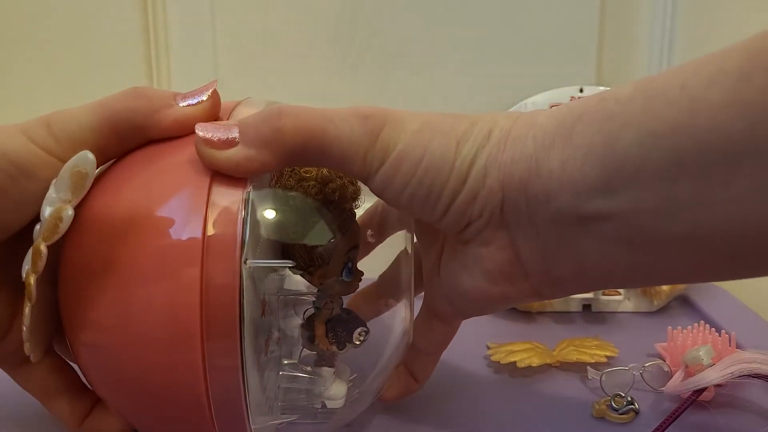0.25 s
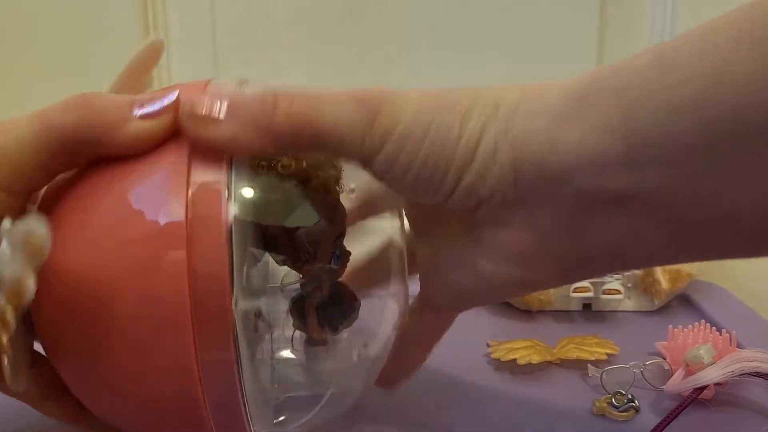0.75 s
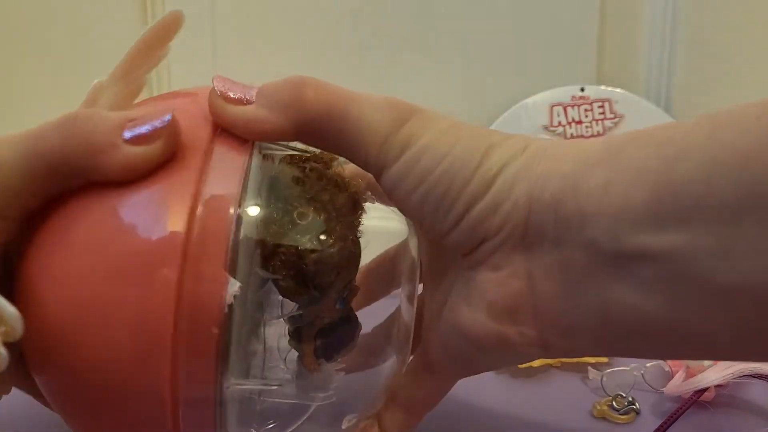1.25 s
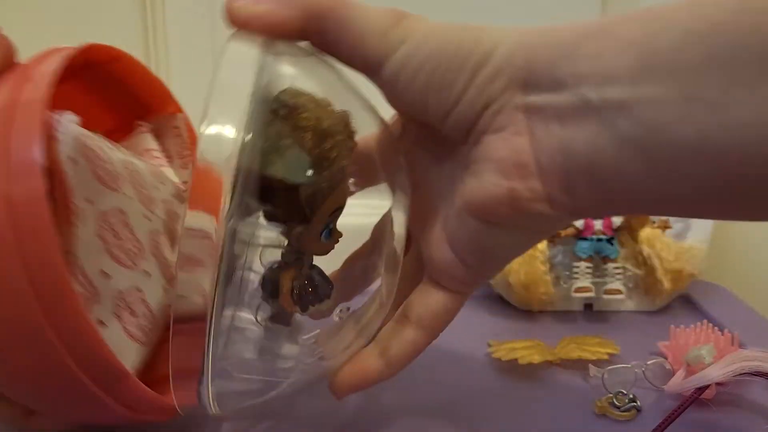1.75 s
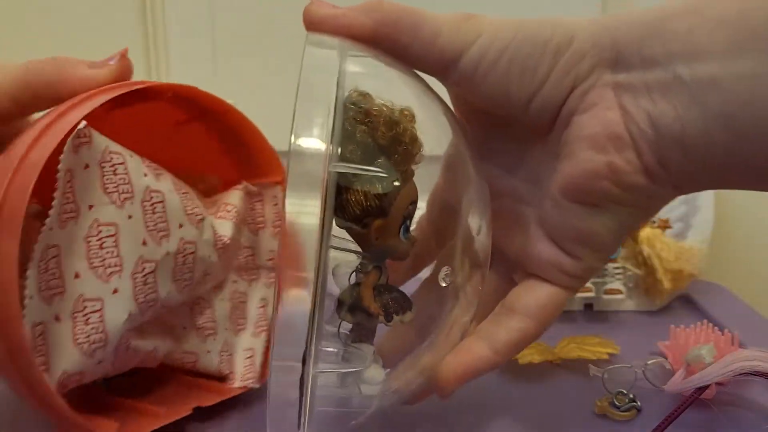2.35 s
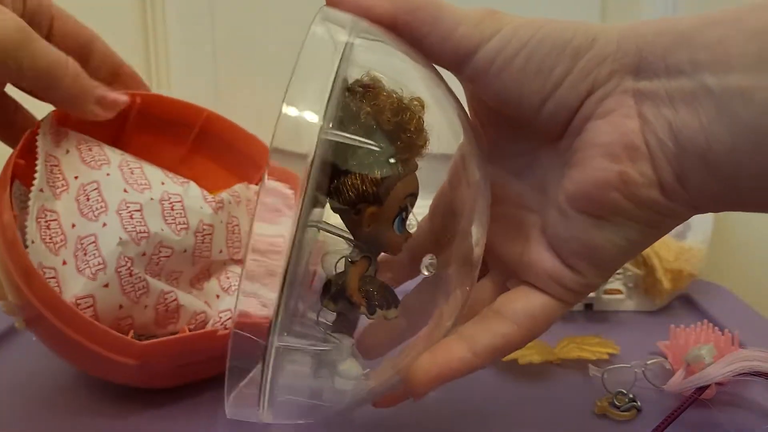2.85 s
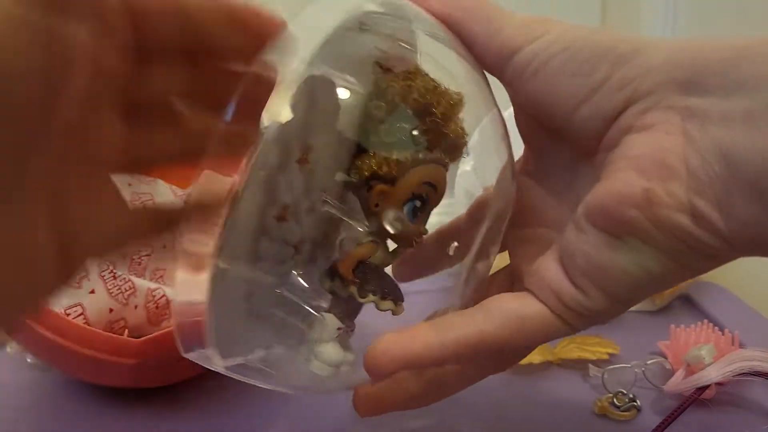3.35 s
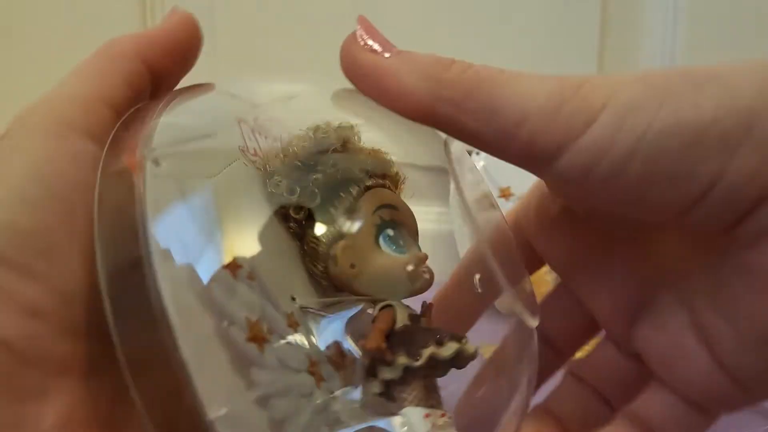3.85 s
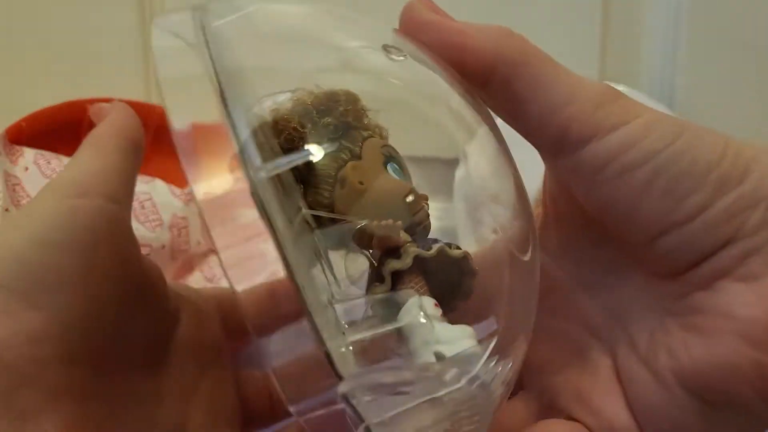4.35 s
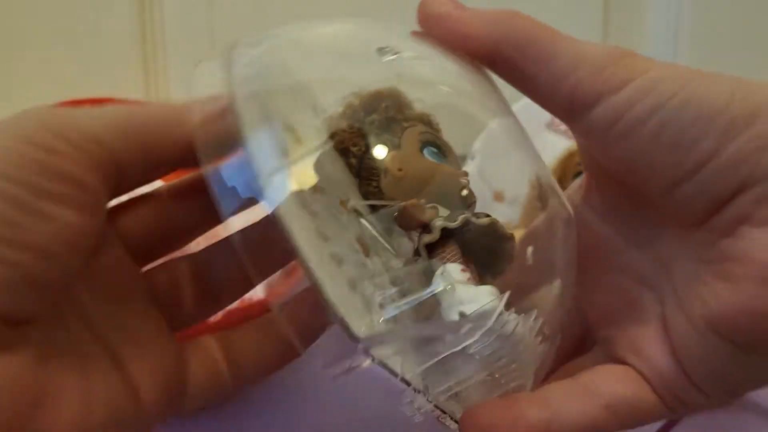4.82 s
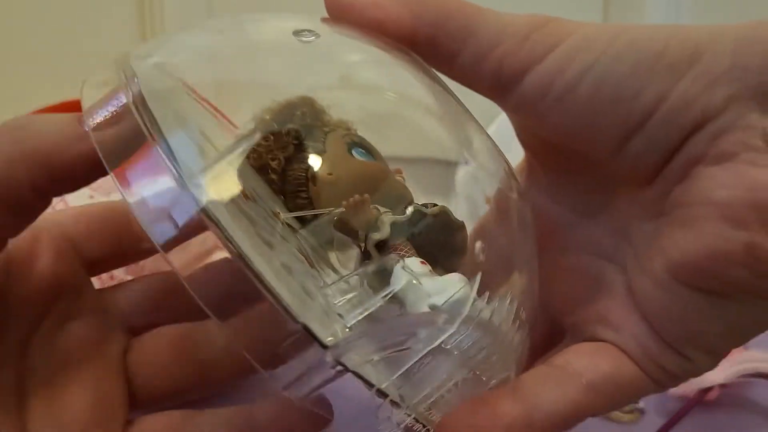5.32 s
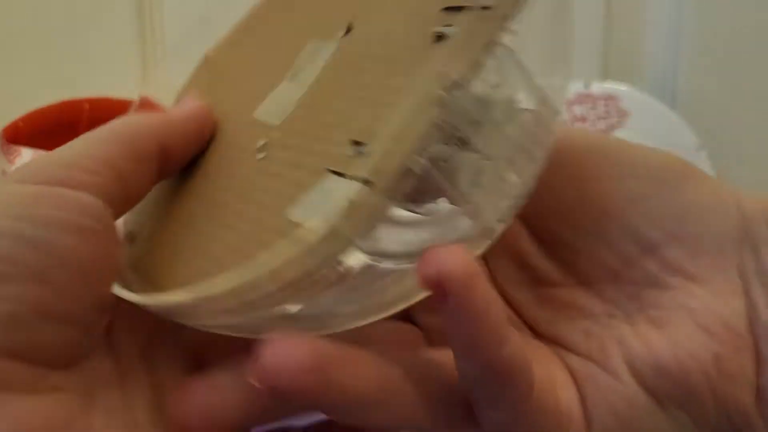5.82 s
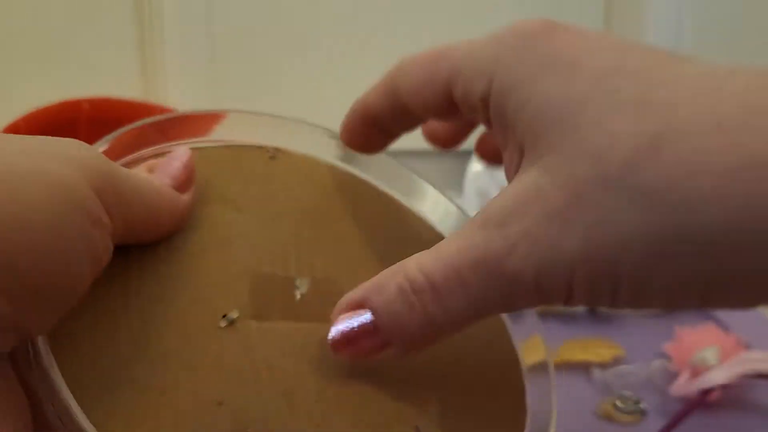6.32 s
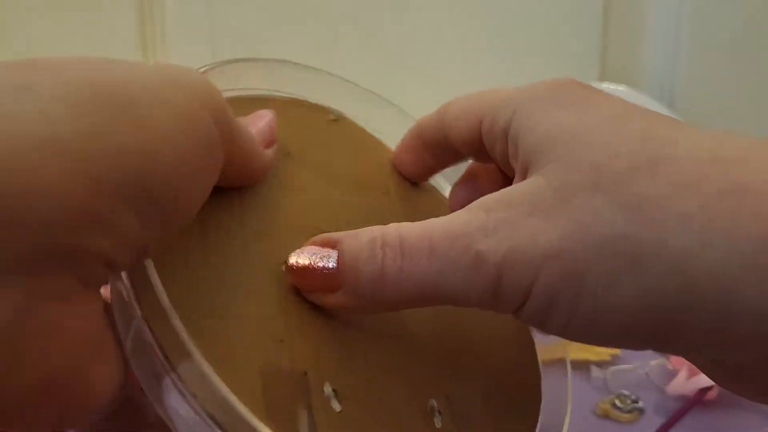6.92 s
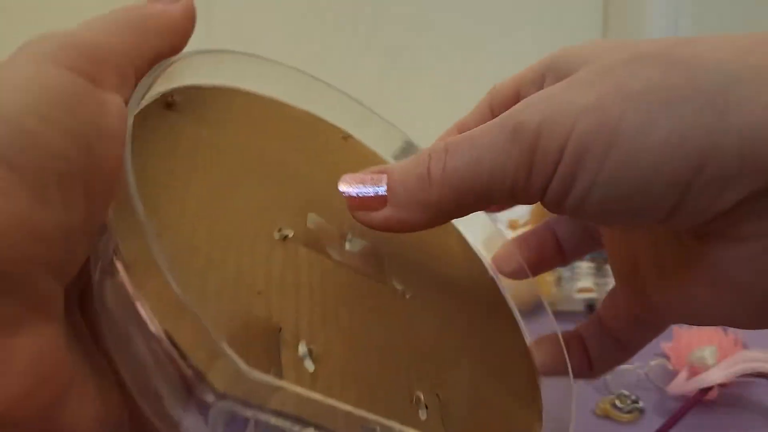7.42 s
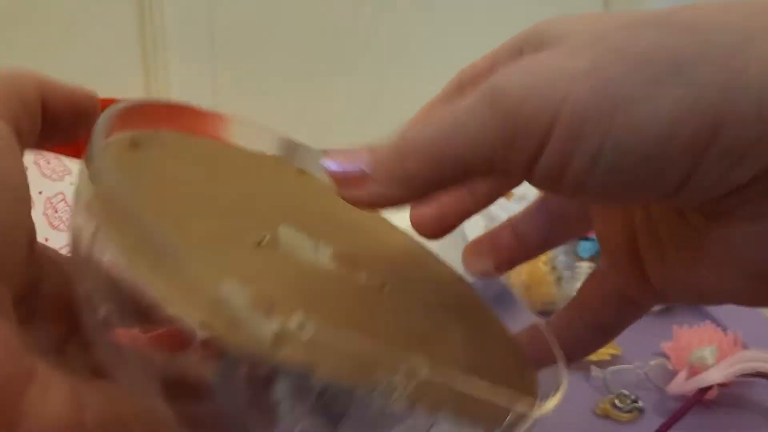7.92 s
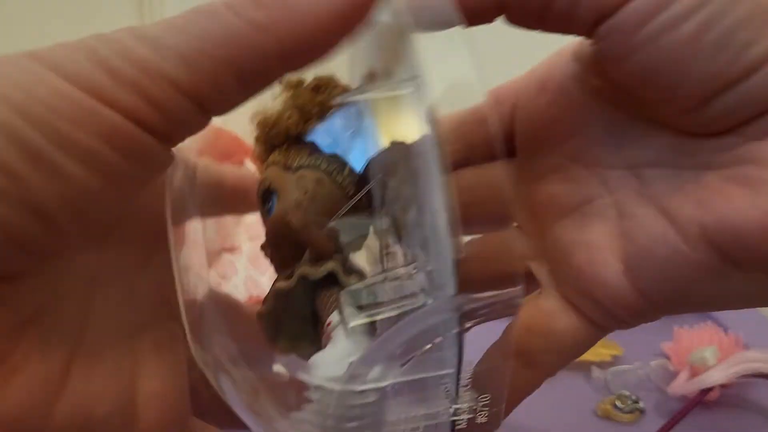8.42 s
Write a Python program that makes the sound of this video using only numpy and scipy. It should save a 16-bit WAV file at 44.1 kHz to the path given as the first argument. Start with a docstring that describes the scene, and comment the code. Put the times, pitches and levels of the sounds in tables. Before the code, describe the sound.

In a small quiet indoor room, close to a stereo microphone, hands pry apart a hollow plastic ball. After near silence come faint ticks, then a loud crack with a low table thump and a cluster of snaps. Lighter rustling and taps follow, then squeaky hollow scraping as the shell is turned, and finally isolated hard snaps and a rapid clatter of pops.

```python
"""Hands pry open a hard plastic ball close to a camera, then turn its clear dome over and press its card lid.
From the start, hiss and low shaking lie under a small quiet room; soon fingers slide, scrape and crackle.
Snaps and taps excite the hollow dome's damped modes behind bursts of filtered noise; low bumps thump.
Sliding is a train of random slips through moving resonances; from 3.4 s, with the ball held in the air,
much less of it reaches the table. Snaps and rubbing go on until past 8 s."""
import sys
import numpy as np
from scipy import signal
from scipy.fft import rfft, irfft
from scipy.io import wavfile
from scipy.ndimage import uniform_filter1d, map_coordinates

SR = 44100
rng = np.random.default_rng(int(sys.argv[2]) if len(sys.argv) > 2 else 0)


def transcribe(signal):
    """Save signal, clipped to [-1, 1], as a 16-bit WAV file at the path in sys.argv[1]."""
    frames = np.atleast_2d(signal).T
    limited = np.clip(frames, -1, 1)
    pcm = np.round(limited * 32767).astype(np.int16)
    wavfile.write(sys.argv[1], SR, pcm)


N = 382617

# Modes of the dome. Each row: frequency in Hz, relative level in dB, decay time t60 in seconds,
# before the grip bends and damps them.
DOME_MODES = [(434.7, 2.5, 0.1), (563, 0.5, 0.054), (642, 5, 0.043), (716, 6.5, 0.077), (821, 0, 0.16),
              (1278, -1, 0.073), (1670, -4.5, 0.11)]
# Spectrum of the table's rumble. Each row: frequency in Hz, relative density in dB per Hz.
TABLE_SPECTRUM = [(60, -33), (95, 3.5), (130, -5.5), (180, -7), (260, -15), (330, -15), (420, -39)]


def snaps():
    """Impact excitation: crack and tick bursts with the damped dome, for left, right and the walls."""
    # Each row: start in seconds, dome ring in dB, dome pitch in Hz, crack in dB, crack colour in Hz,
    # tick in dB, ring time as a factor.
    snap_rows = [(0.748, -42, 644, -49.5, 1820, -65, 0.77), (0.828, -40, 417, -40.5, 2930, -39.5, 0.36),
                 (0.886, -33.5, 403, -50, 1900, -38.5, 0.28), (0.918, -35.5, 446, -36, 3860, -42, 0.38),
                 (0.952, -38, 388, -38, 1270, -36.5, 0.35), (1.334, -27, 507, -37, 3870, -29, 1),
                 (1.357, -16, 930, -16, 3260, -17.5, 0.53), (1.373, -2, 569, -14.5, 3620, -38.5, 0.25),
                 (1.784, -35.5, 476, -38.5, 2020, -35, 0.86), (1.796, -33, 438, -28.5, 1740, -36.5, 0.76),
                 (1.801, -20.5, 531, -22.5, 1850, -26.5, 1), (1.815, -31, 560, -25.5, 4160, -21, 0.95),
                 (1.864, -11.5, 538, -31.5, 2130, -31, 0.9), (1.867, -7.5, 677, -16, 2155, -9, 0.9),
                 (1.898, -15, 520, -18, 2540, -15.5, 0.23), (1.904, -10, 539, -7.5, 3470, -17, 0.8),
                 (2.189, -47.5, 480, -56, 3370, -50, 0.52), (2.251, -31.5, 498, -37, 1250, -45.5, 0.48),
                 (2.623, -20.5, 813, -33.5, 1670, -41.5, 0.4), (2.744, -25.5, 459, -37, 2000, -68, 0.29),
                 (2.778, -25, 460, -25, 3170, -27, 0.62), (2.881, -41, 764, -38.5, 1670, -45, 0.68),
                 (3.051, -32.5, 474, -37, 3280, -42, 0.3), (3.07, -26.5, 585, -28.5, 1160, -36, 0.38),
                 (3.465, -26.5, 711, -44, 1657, -44, 0.45), (3.529, -41, 654, -37, 2960, -43.5, 1),
                 (3.718, -34.5, 440, -45.5, 2620, -55, 0.24), (3.827, -44, 595, -36, 2800, -44, 0.32),
                 (3.835, -20.5, 656, -22, 2700, -34, 0.19), (3.845, -11.5, 574, -26, 1640, -34, 0.67),
                 (3.88, -28, 555, -33, 3200, -38, 0.58), (3.919, -45.5, 608, -42.5, 5270, -43, 0.88),
                 (4.263, -27.5, 738, -41, 1680, -50, 0.89), (4.329, -6.5, 705.6, -19, 5100, -12, 0.69),
                 (4.437, -25, 727, -35, 1260, -29, 0.46), (4.451, -32, 720, -39, 1230, -48.5, 1),
                 (4.791, -33.5, 832, -50.5, 2925, -48.5, 0.89), (4.986, -35, 823, -37.5, 2970, -44.5, 0.94),
                 (5.044, -27.5, 793, -46, 3000, -40, 0.84), (5.112, -24, 880, -43.5, 1660, -44, 0.27),
                 (5.162, -23.5, 808, -47, 1670, -48, 0.28), (5.257, -30.5, 620, -48, 1730, -44.5, 1),
                 (5.337, -19, 870, -36.5, 1670, -52.5, 0.26), (5.363, -25, 537, -45, 1490, -61, 0.58),
                 (5.376, -36.5, 860, -36, 1610, -30, 0.58), (5.393, -28.5, 640, -31, 1640, -41, 0.71),
                 (5.418, -46.5, 700, -47, 4000, -41, 0.47), (5.445, -24, 734, -46, 2200, -52, 0.52),
                 (5.459, -29.5, 680, -48, 1280, -56, 0.25), (5.516, -29.5, 820, -42, 1460, -46, 0.38),
                 (5.526, -16.5, 742, -47, 2900, -34.5, 0.83), (5.572, -22.5, 627, -33, 1240, -39, 0.5),
                 (5.6, -32.5, 731, -39, 2980, -46, 0.8), (5.614, -25.5, 696, -28, 2670, -31.5, 0.29),
                 (5.844, -32.5, 552, -42.5, 1494, -52, 0.74), (5.954, -9, 655, -28.5, 1363, -30.5, 0.5),
                 (6.34, -35.5, 585, -50.5, 1637, -58, 0.57), (6.363, -44.5, 627, -50.5, 1890, -66.5, 0.57),
                 (6.443, -39, 414, -74, 2800, -65, 0.44), (6.48, -33, 651, -54, 3100, -62, 0.42),
                 (6.62, -47, 716, -63, 1640, -71, 0.7), (6.663, -35.5, 726.6, -64, 1800, -61.5, 0.42),
                 (6.68, -38, 690, -43.5, 2840, -68, 0.5), (6.731, -36, 390, -36.5, 2700, -41, 1),
                 (6.745, -29.5, 585, -42, 1380, -47, 0.79), (6.816, -39, 570, -45, 2570, -44, 0.55),
                 (6.862, -54.5, 716, -42, 1920, -46, 0.38), (6.879, -33, 450, -46, 1360, -40, 0.41),
                 (6.903, -48.5, 418, -43.5, 1620, -36, 0.82), (6.983, -46, 685, -54.5, 2500, -62.5, 0.5),
                 (6.9995, -5.5, 651, -13, 1930, -15.5, 0.38), (7.135, -36.5, 800, -39.5, 2520, -49, 0.73),
                 (7.176, -33, 816, -31, 3320, -48, 0.84), (7.191, -25.5, 575, -40, 1303, -39, 0.68),
                 (7.242, -39, 710, -44, 1700, -54, 0.69), (7.399, -29.5, 716, -46, 1716, -55, 0.47),
                 (7.612, -11.5, 715, -21, 5280, -19, 0.41), (7.671, -5, 561, -20, 1260, -19.5, 0.58),
                 (7.71, -6, 601.5, -23, 1220, -14.5, 0.67), (7.714, -5.5, 745, -27, 1250, -41, 0.4),
                 (7.734, -5, 684, -19, 2920, -51, 0.15), (7.747, -18.5, 433, -16, 1250, -29.5, 0.88),
                 (7.749, -26, 442, -23, 12100, -45, 1), (7.751, -1.5, 715, -30, 1270, -39.5, 0.33),
                 (8.165, -24, 653, -49, 1500, -57.5, 0.43), (8.195, -19.5, 653, -30, 1410, -39, 0.36),
                 (8.238, -31, 645, -31, 2770, -30, 1), (8.263, -15, 730, -34, 1620, -28.5, 0.29),
                 (8.296, -27.5, 680, -23, 2780, -49, 1), (8.333, -5.5, 634, -22, 1400, -21.5, 0.49)]
    # Spectra of crack and tick. Each row: frequency in Hz, relative density in dB per Hz.
    crack_spectrum = [(530, -15), (900, -15.5), (1270, -7.5), (1840, -6.5), (2760, -5), (3280, -3.5),
                      (4580, -12.5), (5080, -21), (6000, -18.5), (7800, -50.5), (13200, -120)]
    tick_spectrum = [(2650, -30.5), (4500, -6.5), (5380, -3), (6580, -10), (8050, -2.5), (9840, -18),
                     (12400, -15), (13700, -18.5), (15400, -16.5), (16500, -28.5)]
    swell_s = 0.00306  # the dome's ring builds up over this time
    crack_late_s = 0.00042  # the rim lets go just after the dome starts to move
    spread_ms = 0.063  # each touch lands somewhere else on the shell, so its delay differs
    rim_to_walls = 0.4  # the rim's own colour is heard close by; less comes back from the walls

    out = np.zeros((3, N + SR))
    t = np.arange(SR // 8) / SR
    mode_hz = np.transpose(DOME_MODES)[0][:, None]
    phases = rng.uniform(-2.4, 1.5, (len(snap_rows), len(DOME_MODES), 1))
    bursts = rng.standard_normal((len(snap_rows), 2, len(t)))
    late_s = spread_ms / 1000 * rng.standard_normal(len(snap_rows))
    since_onset = np.maximum(t - np.array([[crack_late_s], [0]]), 0)
    bursts *= 1 - np.exp(-(since_onset / 0.001) ** 2)
    crack_decay = gain_of(-60 * t / 0.026) + 0.04 * gain_of(-60 * t / 0.1)
    tick_decay = gain_of(-60 * t / 0.021) + 0.096 * gain_of(-60 * t / 0.023)
    cracks = coloured(bursts[:, 0] * crack_decay, crack_spectrum)
    ticks = coloured(bursts[:, 1] * tick_decay, tick_spectrum)
    since_swell = t - swell_s  # the ring decays from the end of the swell, each mode at its own random phase

    for k, (s, dome_db, hz, crack_db, crack_hz, tick_db, lasting) in enumerate(snap_rows):
        distance = np.log(mode_hz / hz)
        # the place of the blow favours modes near its pitch
        weights = 0.34 + np.exp(-(distance / 0.095) ** 2)
        # the grip bends the shell until the nearest mode meets the pitch
        bend = hz / mode_hz[np.argmin(abs(distance))]
        dome = ring(since_swell, bend, weights, phases[k], max(lasting, 0.1))
        dome = dome * np.clip(t / swell_s, 0, 1) ** 3
        # the part of the rim that lets go
        rim = resonate(cracks[k] + ticks[k], np.full(len(t), crack_hz), max(600, crack_hz / 5))
        rim = gain_of(crack_db) * 2.0 * max(1, crack_hz / 4000) ** 1.5 * rim
        sound = gain_of(dome_db) * dome / abs(dome).max()
        sound += gain_of(crack_db) * cracks[k] + gain_of(tick_db) * ticks[k]

        first = round(s * SR)
        first_right = round((s + late_s[k]) * SR)
        out[0, first:][:len(t)] += sound + rim
        out[1, first_right:][:len(t)] += sound + rim
        out[2, first:][:len(t)] += sound + rim_to_walls * rim
    return out[:, :N]


def ring(t, bend, weights, phases, lasting):
    """Modal superposition: the dome's modes die away exponentially after one blow."""
    hz, db, t60 = np.transpose(DOME_MODES)[:, :, None]
    decay = gain_of(db - 60 * np.maximum(t, 0) / (t60 * lasting))
    return (weights * decay * np.sin(2 * np.pi * hz * bend * t + phases)).sum(0)


def fingers():
    """Stick-slip friction: quick slips ring the hollow shell; finer slips hiss and crackle in clumps."""
    # Pitch of the shell in hand, before its wander. Each row: time in seconds, pitch in Hz.
    hollow_pitch = [(0, 539.5), (3.3, 547), (3.5, 579.4), (5, 724.6), (6, 643), (8.7, 686)]
    # Spectra of rustle and fine hiss. Each row: frequency in Hz, relative density in dB per Hz.
    rustle_spectrum = [(590, -19.5), (1000, -2.5), (1070, -13), (1660, -2.5), (2110, -11.5), (2790, -7.5),
                       (3340, -11), (5500, -14.5), (7150, -32.5), (12100, -120)]
    fine_spectrum = [(2650, -23.5), (4500, -9), (6730, 2), (8010, 3.5), (9020, -8.5), (15100, -7),
                     (16200, -13.5), (16500, -40.5)]
    apart = 0.78  # weight of the noise that differs at each microphone: rubbing comes from a wide patch

    t = np.arange(N) / SR
    wander = 1 + 0.04 * slow_noise(800)  # the grip shifts the hollow pitch
    hz = np.interp(t, *np.transpose(hollow_pitch)) * wander
    drive = slips(N, 520, 5.1)
    lower = evened(resonate(resonate(drive, hz, 170), hz, 480))
    upper = evened(resonate(drive, 1.9 * hz, 490))
    hollow = lower + 0.14 * upper

    short = np.arange(SR // 50) / SR
    # each kind of tick has its own colour
    grains = rng.standard_normal((6, len(short))) * gain_of(-60 * short / 0.0017)
    crackle = evened(sum(signal.oaconvolve(slips(N, 83, 1.8), g)[:N] for g in grains))
    clumps = gain_of(2.0 * slow_noise(900))
    separate = rng.standard_normal((2, N))
    rubbing = clumps * (0.26 * rng.standard_normal(N) + 0.45 * crackle + apart * separate)

    patch_hz = 2900 * gain_of(1.4 * slow_noise(2500))  # each patch of plastic has its own colour
    rustle = evened(coloured(rubbing, rustle_spectrum))
    rustle = rustle + 0.8 * evened(resonate(rustle, patch_hz, 700))
    fine = evened(coloured(rubbing, fine_spectrum))
    scrape_level, rustle_level, fine_level = pressure()
    return scrape_level * evened(hollow) + rustle_level * evened(rustle) + fine_level * fine


def pressure():
    """Friction follows contact pressure: each stroke lands, changes level in contact and fades."""
    # Fingers dragged over shell and wrapper. Each row: start in seconds, contact in seconds,
    # swell during contact in dB, fade t60 in seconds, then at the end of contact the hollow scrape
    # in dB, rustle in dB, fine hiss in dB.
    strokes = [(0.721, 0.05, 4, 0.16, -53.5, -60.5, -64), (0.807, 0.049, 11, 0.76, -55, -51, -53.5),
               (1.079, 0.015, 24, 1, -68, -59.5, -67.5), (1.408, 0.011, -20, 0.71, -45, -49, -58.5),
               (1.779, 0.029, 11.5, 0.079, -50.5, -44, -52.5), (1.929, 0.026, 7, 0.41, -43, -43, -51),
               (2.19, .256, 7, .05, -45, -47, -57), (2.475, .02, 6, .17, -56, -48, -63),
               (2.541, 0.071, 25, 0.1, -55, -60, -59), (2.631, 0.016, -11.5, 1, -48.5, -57.5, -66.5),
               (2.788, 0.055, -7, 0.37, -49.5, -50.5, -58), (2.98, 0.075, 6, 0.22, -85, -56, -66),
               (3.078, 0.018, 3, 0.43, -41, -52, -59.5), (3.477, 0.069, 14, 0.36, -45, -46.5, -50),
               (3.722, 0.16, 1.5, 0.057, -54, -51.5, -58.5), (3.856, 0.014, -29, 1, -48.5, -53, -59.5),
               (4.048, 0.015, 3.5, 0.26, -51, -50, -59.5), (4.211, 0.059, 10, 0.26, -43, -66.5, -69.5),
               (4.444, 0.068, 0.5, 0.058, -33, -53, -60), (4.847, 0.051, -10, 0.092, -53, -72.5, -82),
               (4.953, 0.093, 9.5, 0.11, -37, -50.5, -57.5), (5.046, 0.059, 3.5, 0.031, -33.5, -49.5, -60),
               (5.301, 0.028, -0.5, 0.079, -46, -56, -53), (5.349, 0.033, 7, 0.068, -37, -68, -57),
               (5.47, 0.062, 14.5, 0.21, -27.5, -42, -49.5), (5.762, 0.11, 6.5, 0.23, -47, -58.5, -65.5),
               (5.889, 0.048, 5.5, 0.28, -65, -50.5, -56), (5.971, 0.044, 17.5, 0.059, -76, -49, -45.5),
               (6.333, 0.28, 2.5, .1, -56.5, -68, -76.5), (6.465, 0.017, 6, 0.032, -51.5, -57.5, -62),
               (6.67, 0.061, 24.5, 0.56, -50.5, -56, -62), (6.857, 0.045, -7, 0.077, -59.5, -57.5, -64.5),
               (7.04, 0.12, 7, 0.16, -49, -49.5, -55.5), (7.128, 0.075, 29, 0.15, -43.5, -42, -59),
               (7.27, 0.13, -5, 0.81, -69.5, -73, -85), (8.108, 0.05, 21.5, 0.55, -36.5, -44.5, -58.5),
               (8.218, 0.11, 11, 0.05, -46, -42, -48.5), (8.35, 0.094, 9, 0.085, -44.5, -45.5, -48.5),
               (8.498, 0.091, 16.5, 0.94, -48.5, -49.5, -52.5)]
    touch_s = 0.0072  # a stroke's landing ramp lasts this long

    t = np.arange(N) / SR
    levels = np.zeros((3, N))
    for start, contact, swell_db, t60, *db in strokes:
        i = slice(round(max(start, 0) * SR), round((start + contact + 1) * SR))
        since = t[i] - start
        swell = swell_db * np.minimum(since / max(contact, 0.005) - 1, 0)
        fade = -60 * np.maximum(since - contact, 0) / max(t60, 0.02)
        shape = np.clip(since / touch_s, 0, 1) * gain_of(swell + fade)
        levels[:, i] += gain_of(db)[:, None] * shape
    return levels


def thumps():
    """Damped low oscillation: each bump on the table is a tone that sags, with a dull puff around it."""
    # Low bumps of hands and shell. Each row: start in seconds, level in dB, starting pitch in Hz.
    bumps = [(0.757, -28, 172), (0.882, -33, 186), (0.95, -32, 143), (1.34, -14, 164), (1.375, -6.5, 153),
             (1.536, -35, 196), (1.579, -37.5, 91), (2.015, -32, 78), (2.191, -38.5, 231),
             (2.23, -35, 89.5), (2.623, -32.5, 84), (2.744, -30.5, 141), (2.77, -17.5, 215),
             (3.062, -32, 233), (3.46, -48, 89.6), (3.722, -51, 213), (3.836, -18.5, 224),
             (4.328, -49, 249), (4.648, -63, 56.4), (5.155, -54.5, 151), (5.39, -43, 98),
             (5.441, -40.5, 285), (5.57, -42, 208), (5.951, -38, 227), (6.357, -50, 77.5),
             (6.742, -47, 197), (6.999, -14.5, 124), (7.305, -50.5, 73.5), (7.61, -44, 108),
             (7.749, -13.5, 221), (8.187, -42, 62), (8.301, -30, 88), (8.327, -28.5, 213)]
    # a bump lasts a fixed time plus some cycles; hard ones are shorter
    fixed_t60_s, cycles, hard_t60_s_per_db = 0.04, 8.0, 0.003
    lag_ms = 0.3  # later at the right microphone

    out = np.zeros(N + SR)
    t = np.arange(SR // 3) / SR
    puffs = evened(coloured(rng.standard_normal((len(bumps), len(t))), TABLE_SPECTRUM))
    for (s, db, hz), puff in zip(bumps, puffs):
        t60 = max(fixed_t60_s + cycles / hz - hard_t60_s_per_db * (db + 34.0), 0.03)
        tone = np.sin(2 * np.pi * hz * t / (1 + 3 * t))
        attack = 1 - np.exp(-t / 0.00079)
        out[round(s * SR):][:len(t)] += gain_of(db - 60 * t / t60) * attack * (tone + 1.1 * puff)
    right = np.roll(out, round(lag_ms * SR / 1000))
    return np.array([out, right])[:, :N] * gain_of([[1.8], [-1.8]])


def rumble(pressing):
    """Structure-borne sound: low shaking through camera and table, related on both sides."""
    # Handling. Each row: time in seconds, camera shake in dB, table rumble in dB.
    handling = [(0, -62.5, -65), (.7, -65.5, -76), (.95, -49.5, -56), (1.5, -54, -60), (3.05, -53.5, -67.5),
                (3.6, -60, -73), (4.75, -69, -79), (5.5, -59, -61), (6.25, -63.5, -71.5),
                (8.67, -64.5, -76)]
    # Spectrum of the camera's shake. Each row: frequency in Hz, relative density in dB per Hz.
    shake_spectrum = [(20, -19), (40, -11), (56, 8), (75, -5), (100, -21), (130, -42.5)]
    lift_s = 3.4  # until then the ball lies on the table, afterwards it is held in the air
    press_db, held_db = -1.5, -27  # rumble under each stroke, relative to the hollow scrape

    s, shake_db, table_db = np.transpose(handling)
    t = np.arange(N) / SR
    a, b, c, d = rng.standard_normal((4, N))
    shake = evened(coloured(np.array([a + 0.086 * b, a - 0.063 * b]), shake_spectrum))
    table = evened(coloured(np.array([c + 1.2 * d, c - 0.15 * d]), TABLE_SPECTRUM))
    shake = shake * gain_of(np.interp(t, s, shake_db))
    coupling = gain_of(np.where(t < lift_s, press_db, held_db))
    table = table * (gain_of(np.interp(t, s, table_db)) + coupling * pressing)
    return shake * gain_of([[2.2], [-2.2]]) + table * gain_of([[1.1], [-1.1]])


def room(x):
    """Diffuse reverberation: sparse taps of random sign, each band dying at its own speed."""
    # Reverberation time. Each row: frequency in Hz, t60 in seconds.
    reverb_times = [(200, 0.48), (550, 0.15), (1400, 0.25), (3700, 0.22), (9700, 0.22)]

    taps = np.zeros((2, SR // 2))
    slots = np.arange(200, SR // 2 - 20, 20)
    shape = (2, len(slots))
    places = slots + rng.integers(0, 20, shape)
    np.put_along_axis(taps, places, rng.choice([-1., 1.], shape), 1)
    hz, t, bands = signal.stft(taps, SR, nperseg=256)
    f, t60 = np.transpose(reverb_times)
    band_t60 = np.interp(np.log(hz + 1), np.log(f), t60)[:, None]
    tail = signal.istft(bands * gain_of(-60 * t / band_t60), SR, nperseg=256)[1]
    return signal.fftconvolve(x[None], tail / np.linalg.norm(tail[0]), axes=1)[:, :N]


def background_hiss():
    """Stationary filtered noise: room and microphones, independent on the two sides."""
    # Each row: frequency in Hz, relative density in dB per Hz.
    hiss_spectrum = [(180, -32), (330, -27), (406, -14.5), (449, -10.5), (2790, -11), (4030, -10),
                     (4540, -5), (5640, -17.5), (8440, -9.5), (10500, -22.5), (15200, -17.5), (16500, -17)]
    return gain_of(-76.5) * evened(coloured(rng.standard_normal((2, N)), hiss_spectrum))


def resonate(x, hz, width):
    """Heterodyned resonance: shifts the curve hz down to zero, smooths by width in Hz, shifts back."""
    turn = np.exp(2j * np.pi * np.cumsum(hz) / SR)
    r = np.exp(-np.pi * width / SR)
    return 2 * (turn * signal.lfilter([1 - r], [1, -r], x / turn)).real


def slips(size, per_s, spread_db):
    """Random impulse process: sparse slips of either sign with exponentially spread levels, unit rms."""
    height = gain_of(spread_db * np.minimum(rng.exponential(1, size), 4))
    happens = rng.random(size) < per_s / SR
    return evened(height * rng.choice([-1., 1.], size) * happens)


def slow_noise(samples):
    """Low-pass noise: a moving average over the given samples, at unit rms."""
    return evened(uniform_filter1d(rng.standard_normal(N), samples))


def gain_of(db):
    """Logarithmic level: decibels to amplitude gain."""
    return 10 ** (np.asarray(db) / 20)


def evened(x):
    """Power normalization: scaled to unit rms."""
    return x / np.sqrt(np.mean(x ** 2) + 1e-20)


def coloured(x, points):
    """Minimum-phase filtering: a causal filter with the given spectrum, steep outside it; unit energy."""
    hz = np.fft.fftfreq(4096, 1 / SR)
    f, db = np.transpose(points)
    level_db = np.interp(np.log(abs(hz) + 1), np.log(f + 1), db, left=-60, right=-60)
    log_gain = level_db * np.log(10) / 20
    # the Hilbert transform of the log gain supplies the phase
    taps = np.fft.ifft(np.exp(np.conj(signal.hilbert(log_gain)))).real[:2048]
    taps = (taps / np.linalg.norm(taps)).reshape((1,) * (x.ndim - 1) + (-1,))
    return signal.oaconvolve(x, taps, axes=-1)[..., :x.shape[-1]]


def scene():
    """Spaced-pair hearing: delay, level and shading place the hands over table, room, hiss and rumble."""
    # The hands stand left of centre. Each row: time in seconds, right microphone later by ms,
    # left louder by dB.
    placement = [(0, 0.098, 36), (.7, 0.049, 3.5), (1.7, 0.078, 3.5), (2.001, .2, 2), (6.201, 0.26, 5),
                 (6.8, 0.14, 2.6), (8.6, 0.058, 0.9)]
    # The shell shades the left microphone. Each row: frequency in Hz, level over the right in dB.
    left_shade = [(250, 0.5), (600, -1.5), (1300, 1.5), (12000, -3)]
    # Echo off the table top, left then right. Each row: delay in ms, level in dB.
    table_echo = [(.45, -17.5), (.8, -23)]

    t = np.arange(N) / SR
    hands = snaps() + fingers()[[0, 1, 0]]  # left, right, towards the walls
    s, lag_ms, pan_db = np.transpose(placement)
    right = map_coordinates(hands[1], [(t - np.interp(t, s, lag_ms) / 1000) * SR], order=3)
    hz, db = np.transpose(left_shade)
    shade = gain_of(np.interp(np.log(np.fft.rfftfreq(N, 1 / SR) + 1), np.log(hz), db))
    left = irfft(rfft(hands[0]) * shade, N)
    side = gain_of(np.interp(t, s, pan_db) / 2)

    near = []
    for x, (delay_ms, echo_db) in zip((left * side, right / side), table_echo):
        near.append(x + gain_of(echo_db) * np.roll(x, round(delay_ms * SR / 1000)))
    walls = gain_of(-11.0) * room(hands[2])
    return np.array(near) + walls + background_hiss() + rumble(pressure()[0]) + thumps()


def record(dry):
    """Microphone response: the deepest bass is lost, high peaks are rounded off, then the band is limited."""
    edge_hz = 16300
    thin = signal.sosfilt(signal.butter(2, 45., "high", fs=SR, output="sos"), dry)
    rounded = thin / (1 + thin ** 4) ** (1 / 4)
    band_limit = signal.firwin(511, edge_hz, window=("kaiser", 9), fs=SR)
    return signal.oaconvolve(rounded, band_limit[None], "same")


dry = scene()
out = record(dry)
transcribe(out)
```